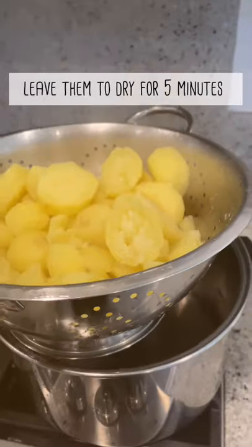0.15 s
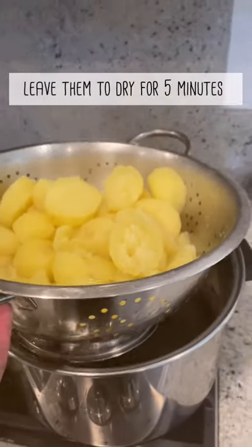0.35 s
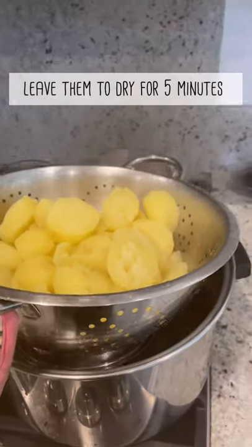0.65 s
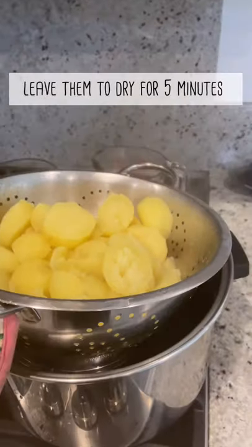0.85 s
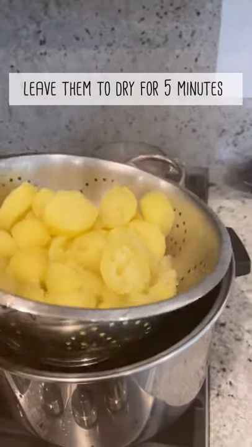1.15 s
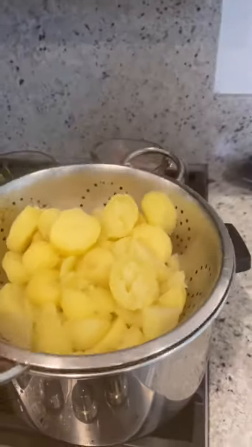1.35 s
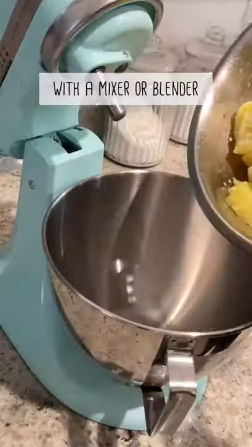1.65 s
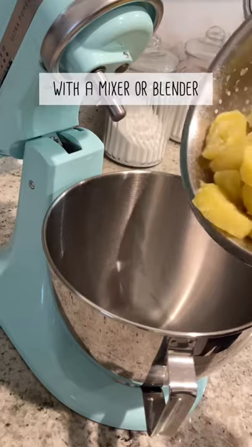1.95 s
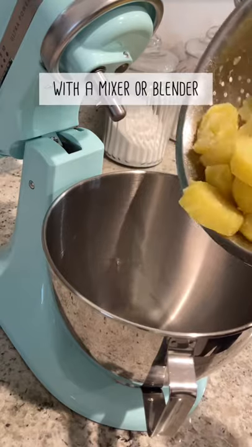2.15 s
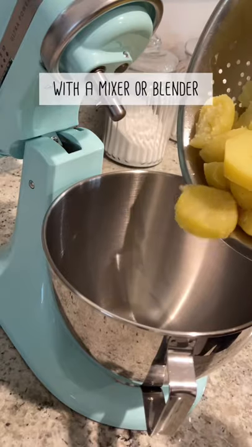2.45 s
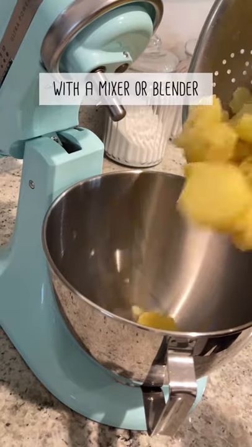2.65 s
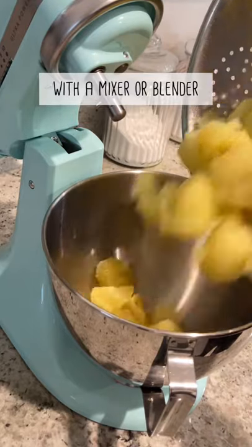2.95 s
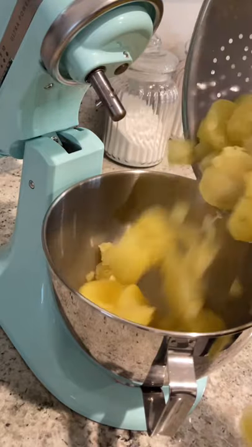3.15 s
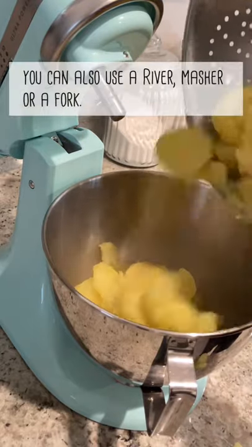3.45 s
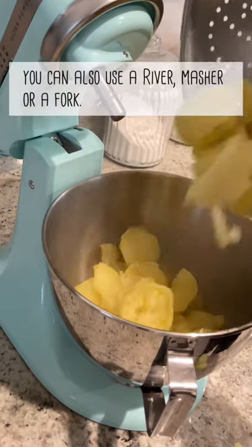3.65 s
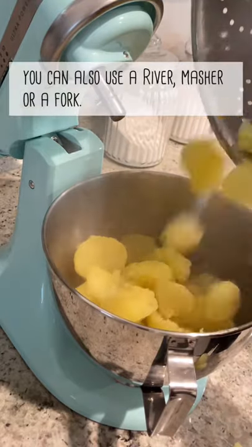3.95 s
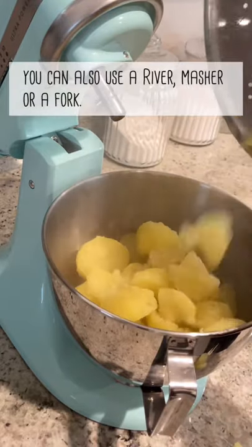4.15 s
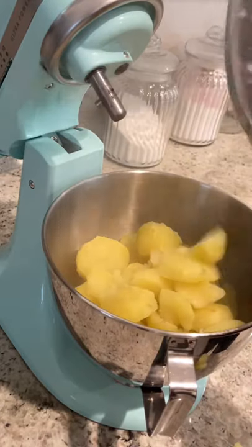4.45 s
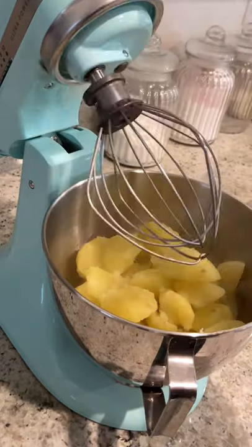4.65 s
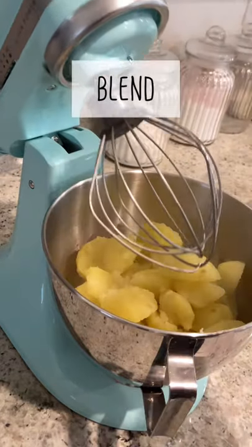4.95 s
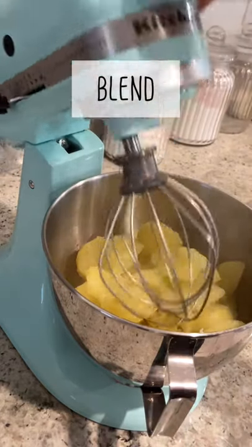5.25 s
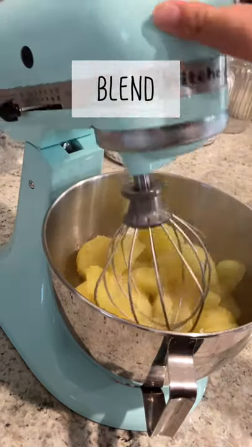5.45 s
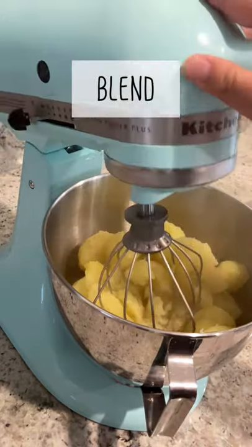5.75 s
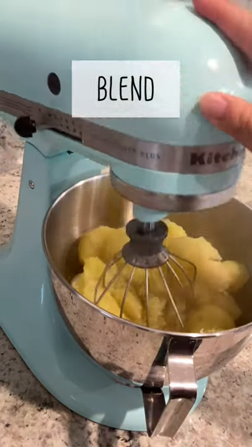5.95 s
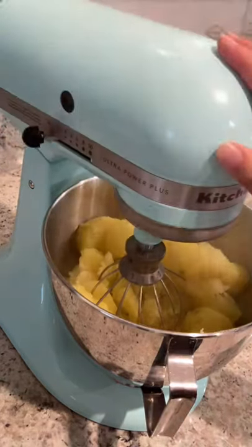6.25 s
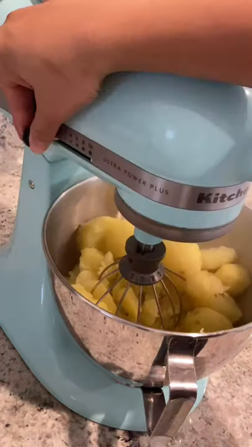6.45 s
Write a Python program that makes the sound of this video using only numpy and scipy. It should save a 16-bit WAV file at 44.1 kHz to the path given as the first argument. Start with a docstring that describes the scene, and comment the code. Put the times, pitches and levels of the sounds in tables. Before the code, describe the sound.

Close stereo microphone on a kitchen counter. First, faint handling bumps and steam hiss, then clattering metallic knocks as a colander settles on a pot, cut off sharply. Next, boiled potatoes drop softly into a metal bowl, one heavier thud followed by tumbling, rumble and sticky ticks. After a quiet pause come light whisk contacts, a weighty mixer-head slam with a small bounce, and a crisp final switch click.

```python
"""A steel colander of steaming potatoes knocks and settles on its pot, close to a pair of microphone ports.
Potatoes tumble into a mixer's steel bowl on a stone counter with wet ticks; the whisk sinks in, the mixer
head drops shut and its switch clicks. Blows ring the steel's resonances and set off bursts of banded noise;
wet ticks, steam hiss and the kitchen's room tone are shaped noise; noise-fed counter modes rumble, swelling
under the knocks and the rolling potatoes. The background steps between four stretches; some ringing stops dead."""
import sys
import numpy as np
from scipy import signal
from scipy.fft import rfft, irfft, next_fast_len
from scipy.io import wavfile
from scipy.ndimage import uniform_filter1d

SR = 44100
rng = np.random.default_rng(int(sys.argv[2]) if len(sys.argv) > 2 else 0)


def store_wav(level_fs):
    """Save 16-bit WAV to argv[1]."""
    pcm = np.round(np.clip(np.atleast_2d(level_fs), -1, 1) * 32767)
    wavfile.write(sys.argv[1], SR, pcm.T.astype(np.int16))


N = 290619
T = np.arange(N) / SR   # seconds

COLANDER_CUT_S, HEAD_CUT_S, SWITCH_S = 1.548, 6.376, 6.53
# Resonances of the counter (first three rows) and the steel bowl.
# Each row: pitch in Hz, relative level in dB, time to fall 60 dB when struck in seconds.
BOWL_MODES = [(54, 1, 0.24), (117, -2.5, 0.16), (149.5, -10.5, 0.15), (425, -4, 0.09), (447, -17, .3),
              (586, -18, 0.55), (662, -29, 0.4), (720, -35, 1.2), (830, -11, 0.11), (958, -31, .35),
              (1120, -39, 0.7), (1200, -13, 0.078), (1870, -19, 0.06), (2400, -11, 0.11), (2800, -11, .07)]


def amp(db):
    """Decibels to a linear factor."""
    return 10 ** (np.asarray(db) / 20)


def rms_one(x):
    """Scale a signal to an RMS of 1."""
    return x / np.sqrt(np.mean(x ** 2) + 1e-20)


def at_hz(points, hz):
    """Read a curve at one pitch, straight between its points on a log pitch scale."""
    points = np.array(points)
    return np.interp(np.log(hz), np.log(points[:, 0]), points[:, 1])


def drift(rate_hz):
    """Slow chance of spread 1: noise through two equal low-pass poles, drawn every 40 samples."""
    pole = np.exp(-80 * np.pi * rate_hz / SR)
    chance = rng.standard_normal(N // 40 + 2002)
    slow = signal.lfilter([1], [1, -2 * pole, pole * pole], chance)[2000:]
    return np.interp(np.arange(N) / 40, np.arange(len(slow)), rms_one(slow))


def spread(pair, hz):
    """Shared and opposed parts to left and right, as alike as the ports are at this pitch."""
    # Likeness of the two ports. Each row: pitch in Hz, left-right likeness (1 is identical).
    likeness = [(60, 1), (260, 0.97), (440, 0.71), (620, 0.15), (1200, 0.55), (2000, 0.81), (3000, 0.053),
                (4200, 0.16), (5500, 1), (6500, 0.95), (16000, 0.76)]
    alike = np.clip(at_hz(likeness, hz), -1, 1)
    shared = np.sqrt(1 + alike) * pair[0]
    opposed = np.sqrt(1 - alike) * pair[1]
    return shared + opposed * [[1], [-1]]


def ring(x, hz, t60):
    """A resonance: a unit click sets a sine of height 1 ringing, down 60 dB after t60 seconds."""
    pole, turn = amp(-60 / (t60 * SR)), 2 * np.pi * hz / SR
    return signal.lfilter([0, np.sin(turn)], [1, -2 * pole * np.cos(turn), pole * pole], x + 1e-18)


def noise_bands():
    """Third-octave bands of stereo noise, equal level per Hz, as (Hz, sound)."""
    edges = 32 * 2 ** (np.arange(28) / 3)
    white = rng.standard_normal((2, 2, N))   # neighbouring bands take turns between two noises
    for k, (low, high) in enumerate(zip(edges, edges[1:])):
        sos = signal.butter(2, [low, high], "band", fs=SR, output="sos")
        middle_hz = np.sqrt(low * high)
        yield middle_hz, spread(signal.sosfilt(sos, white[k % 2]), middle_hz)


def strength(events, hz):
    """Click train of the blows at one pitch: bass, middle and treble force joined on a log scale."""
    rows, clicks = np.array(events), np.zeros(N)
    bass = rows[:, 3] if rows.shape[1] > 3 else rows[:, 1]
    low = np.interp(np.log(hz), np.log([160, 260]), [1, 0])
    high = np.interp(np.log(hz), np.log([1000, 3200]), [0, 1])
    force_db = low * bass + (1 - low - high) * rows[:, 1] + high * rows[:, 2]
    clicks[np.round(rows[:, 0] * SR).astype(int)] = amp(force_db)
    return clicks


def dying(clicks, t60, rise_s):
    """Level that swells for a moment after each click and dies away."""
    rise = np.exp(-1 / (max(rise_s, 1e-4) * SR))
    fall = amp(-60 / (max(t60, .005) * SR))
    return signal.lfilter([1 - rise], np.convolve([1, -rise], [1, -fall]), clicks + 1e-18)


def scatter(spells, per_s, uneven_db):
    """Small events at random moments of each spell, uneven in strength, fading as it goes on."""
    rows = []
    for start, length, fade_db, *db in spells:
        for u, v in rng.random((200, 2))[:int(per_s * length)]:
            change_db = -fade_db * u - uneven_db * np.log(1 - 0.9 * v)
            rows.append((start + length * u, *np.add(db, change_db)))
    return rows


def struck(events, modes, contact_s, ring_db, waver_db, until_s):
    """A blow pushes the heavy counter once and chatters on the steel; loose contact makes the ringing waver."""
    push_s = .004    # how long a blow leans on the counter
    chatter_share = .35   # loose chatter in a blow on steel, the rest one clean contact
    out = np.zeros((2, N))
    span = slice(round(min(events)[0] * SR) - 100, round(until_s * SR))
    for hz, db, t60 in modes:
        force = np.tile(strength(events, hz)[span], (2, 1))
        if hz > 200:   # steel
            chance = rng.standard_normal(force.shape)
            chatter = dying(force, contact_s, rise_s=0.0012) * chance * np.sqrt(14 / (contact_s * SR))
            sides = [[1], [.4 * rng.choice([-1, 1])]]   # shared and opposed parts
            contact = uniform_filter1d(force * sides, size=round(SR / hz / 3))
            force = chatter_share * chatter + np.sqrt(1 - chatter_share ** 2) * contact
            db = db + ring_db + waver_db * np.tanh(drift(30)[span])
        else:
            force = uniform_filter1d(force, size=round(push_s * SR))
        out[:, span] += amp(db) * spread(ring(force, hz, t60), hz)
    return out


def wash(events, spectrum, hz, crack_s, tail_s, tail_db):
    """Level of a body's countless small modes in one band: a crack, then a swelling tail; faster in the treble."""
    # crack_s and tail_s are 60 dB falls at 1 kHz
    clicks = strength(events, hz) * amp(at_hz(spectrum, hz)) * np.sqrt(SR / 2 / hz)
    crack = dying(clicks, crack_s * (1000 / hz) ** .3, rise_s=.001 * (1000 / hz) ** .5)
    tail = dying(clicks, tail_s * (1000 / hz) ** 0.18, rise_s=0.0045)
    return crack + amp(tail_db) * tail


def colander():
    """Steel colander on the pot rim: knocks and rattles ring its modes; returns ringing and wash level by band."""
    # Knocks on the rim. Each row: time in seconds, middle and treble force in dB.
    knocks = [(0.835, -17.5, -17), (0.861, -19.5, -35), (0.877, -30.5, -41.5), (0.959, -16, -30),
              (1.049, -30, -48.5), (1.292, -37.5, -50.5), (1.323, -22.5, -36), (1.332, -23, -30),
              (1.340, -18.5, -18), (1.399, -13, -14.5), (1.436, -24.5, -27), (1.469, -21.5, -36),
              (1.523, -21, -29)]
    # Rattling on after knocks. Each row: start and length in seconds, fade over the spell in dB,
    # middle and treble force in dB before fade and unevenness.
    rattles = [(0.84, 0.15, 11.5, -34.5, -46.5), (0.965, 0.31, 25, -38, -51.5),
               (1.324, 0.085, 6, -42.5, -41.5), (1.405, 0.089, 16, -28.5, -33.5)]
    # Resonances. Each row: pitch in Hz, relative level in dB, time to fall 60 dB in seconds.
    modes = [(330, -3, .14), (364, -4, .22), (565, -13, .5), (754, -13, .9), (788, -6, .18), (864, -3, .16),
             (955, -8, .15), (1055, -12, .2), (1164, -5, .2), (1320, -12, .25), (1655, -20, .45),
             (1930, -20, .35), (2435, -13, .6), (2650, -15, .3), (3255, -15, .6), (3366, -13, .25),
             (3455, -15, .3), (3682, -19, .4), (3820, -14, .3), (3967, -9, .12), (4066, -12, .45),
             (4097, -13, .3), (4200, -12, .27), (4544, -19, .5), (4700, -11, .3), (4802, -13, .2),
             (5092, -15, .3), (5285, -9, .25), (5345, -8, .18), (5460, -14, .25), (5636, -13, .3),
             (5905, -11, .18)]
    # Colour of the small modes. Each row: pitch in Hz, relative level in dB.
    colour = [(150, -19), (350, -20.5), (900, -17.5), (2000, -12), (3000, -10), (5000, -2), (8000, -9),
              (15000, -21)]
    events = knocks + scatter(rattles, per_s=130, uneven_db=2.5)

    def wash_level(hz):
        level = wash(events, colour, hz, crack_s=0.058, tail_s=0.21, tail_db=-17.0)
        rattling = amp(3.4 * drift(50))
        return (T < COLANDER_CUT_S) * level * rattling

    ringing = struck(events, modes, contact_s=0.031, ring_db=-11.0, waver_db=5.5, until_s=COLANDER_CUT_S)
    return ringing, wash_level


def potatoes_in_bowl():
    """Potatoes and whisk thud on bowl and counter; returns the ringing and the wash level by band."""
    # Separate thuds. Each row: time in seconds, middle, treble and bass force in dB.
    thuds = [(1.954, -31, -45.5, -25), (2.651, -34, -41.5, -29), (2.824, -10, -34.5, -24.5),
             (2.879, -44, -46.5, -20.5), (3.032, -42.5, -72, -33), (3.21, -50, -60, -31),
             (3.643, -46.5, -91, -33), (3.847, -50, -56, -34.5), (3.898, -87, -67, -34),
             (4.599, -76, -80, -40), (5.233, -52.5, -73, -54), (5.265, -43, -51.5, -47),
             (5.299, -68, -79, -38), (5.356, -56, -63.5, -34.5)]
    # The heap tumbling in with many more thuds. Each row: start and length in seconds, fade over the spell
    # in dB, middle, treble and bass force in dB before fade and unevenness.
    tumble = [(2.86, 0.76, 33, -47.5, -68, -35.5)]
    # Colour of the bowl's small modes. Each row: pitch in Hz, relative level in dB.
    colour = [(150, -6.5), (400, -19.5), (1000, -15.5), (2500, -4), (5000, -1), (9000, 2.5), (15000, -4)]
    events = thuds + scatter(tumble, per_s=24, uneven_db=7.5)

    def wash_level(hz):
        return wash(events, colour, hz, crack_s=0.04, tail_s=0.24, tail_db=-15)

    ringing = struck(events, BOWL_MODES, contact_s=0.018, ring_db=-2.0, waver_db=2.5, until_s=HEAD_CUT_S)
    return ringing, wash_level


def wet_ticks():
    """Potatoes part, land and slide with wet ticks; returns their fluttering noise level by band."""
    # Separate ticks. Each row: time in seconds, treble and middle force in dB.
    single = [(2.9213, -37.5, -61), (3.0769, -41, -45), (3.146, -45, -38), (3.1888, -34.5, -44),
              (3.2144, -45, -61), (3.4915, -41, -74), (3.2445, -62, -58), (3.6332, -36.5, -63),
              (3.7529, -48, -67), (3.7826, -33.5, -44), (3.7924, -58, -31), (3.8408, -28, -26.5),
              (3.966, -43, -44), (4.034, -36, -26), (4.0852, -41.5, -72), (4.104, -46, -64),
              (4.4687, -40, -65.5), (4.6738, -51, -39.5), (6.0886, -51, -43)]
    # Crackle of sliding potatoes and the whisk pressing in. Each row: start and length in seconds,
    # fade over the spell in dB, treble and middle force in dB before fade and unevenness.
    crackle = [(2.6, 0.35, 6, -67, -52), (5.45, 1.1, 0, -73.5, -61.5), (2.88, 1.25, 1.5, -63, -59)]
    # Colour of a tick. Each row: pitch in Hz, relative level in dB.
    colour = [(700, -52), (1800, -13), (3000, -11), (5500, -6), (9000, -2), (12000, -7.5), (16000, 1)]
    rows = np.array(single + scatter(crackle, per_s=60, uneven_db=7.0))

    def tick_level(column):
        clicks = np.zeros(N)
        clicks[np.round(rows[:, 0] * SR).astype(int)] = amp(rows[:, column])
        room_tail = amp(-19.5) * dying(clicks, 0.099, rise_s=0.0065)
        return dying(clicks, 0.014, rise_s=0.00063) + room_tail

    bright, dull = tick_level(column=1), tick_level(column=2)

    def level_at(hz):
        flutter_db = 2.6 * drift(78)
        return (bright if hz > 4000 else dull) * amp(at_hz(colour, hz) + flutter_db)

    return level_at


def taps():
    """Steel touches the bowl, first the colander, then the whisk, and wavering pitches ring."""
    # Touches. Each row: time in seconds, middle and treble force in dB.
    touches = [(1.958, -53.5, -67.5), (5.264, -47.5, -52)]
    # The colander's own pitch, then the bowl rim's.
    # Each row: pitch in Hz, relative level in dB, time to fall 60 dB in seconds.
    modes = [(1812, -11, 0.5), (1790, -6, .15), (3270, -12, 0.1), (3960, -12, 0.07), (4830, -14, 0.06),
             (5600, -16, 0.08)]
    own = struck(touches[:1], modes[:1], contact_s=0.0076, ring_db=14.0, waver_db=4.5, until_s=HEAD_CUT_S)
    rim = struck(touches, modes[1:], contact_s=0.0071, ring_db=8.0, waver_db=7.0, until_s=HEAD_CUT_S)
    return own + rim


def slides():
    """Potatoes sliding down the wall keep one bowl pitch singing through long, chattering contact."""
    # Slides. Each row: time in seconds, middle and treble force in dB.
    moments = [(3.178, -54, -74), (3.375, -57.5, -77)]
    # The one pitch. Each row: pitch in Hz, relative level in dB, time to fall 60 dB in seconds.
    mode = [(1108, 0, 0.16)]
    return struck(moments, mode, contact_s=0.5, ring_db=2.0, waver_db=7.0, until_s=HEAD_CUT_S)


def bumps():
    """Small dull knocks of handling and of potatoes on steel each ring a few cycles of one pitch."""
    # Each row: time in seconds, starting peak in dB, pitch in Hz.
    knocks = [(0.032, -39, 457), (0.067, -48, 483), (0.262, -46, 538), (0.529, -44.5, 626),
              (0.579, -37.5, 1170), (0.58, -40, 428), (0.644, -42.5, 483), (1.927, -48.5, 586),
              (2.921, -47, 1870), (2.984, -49, 1800), (3.098, -51, 1870), (3.147, -51, 1860),
              (3.214, -53, 2840), (3.263, -53, 1170), (3.793, -44.5, 1140), (4.5452, -52, 1210),
              (4.901, -44.5, 364), (5.353, -37, 366), (5.594, -50, 1250), (5.907, -49, 1230)]
    cycles = 31   # until a knock has died by 60 dB
    out = np.zeros((2, N))
    for s, db, hz in knocks:
        start = round(s * SR)
        since = T[:N - start][:SR // 5]
        note = amp(db - 60 * since * hz / cycles) * np.sin(2 * np.pi * hz * since)
        out[:, start:start + len(since)] += note
    return out


def mixer_head():
    """The head drops shut and bounces, then the switch clicks, ringing its body; returns ringing and wash level."""
    # Shutting, bounces, switch. Each row: time in seconds, middle, treble and bass force in dB.
    slams = [(6.151, -13, -21.5, -12), (6.156, -11.5, -9, -6), (6.166, -41, -21, -14),
             (6.196, -25, -42, -17.5), (6.537, -18.5, -30.5, -41), (6.544, -96, -8, -20.5),
             (6.562, -21.5, -36, -35), (6.581, -34, -46, -25)]
    # Resonances. Each row: pitch in Hz, relative level in dB, time to fall 60 dB in seconds.
    modes = [(61, 0, .25), (78, -13, .4), (101, -17, .22), (119, -5, 0.26), (352, -8, 0.22), (385, -8, .1),
             (479, -15, .2), (594, -15, 0.4), (814, -12, 0.14), (1015, -13, 0.13), (1800, -14.5, 0.064)]
    # Colour of the small modes. Each row: pitch in Hz, relative level in dB.
    colour = [(270, -23), (380, -13.5), (1000, -15.5), (2500, -17.5), (5000, -21.5), (9000, -23.5),
              (15000, -31.5)]
    shutting = [row for row in slams if row[0] < SWITCH_S]
    switch = slams[len(shutting):]

    def wash_level(hz):
        shut = wash(shutting, colour, hz, crack_s=0.072, tail_s=0.43, tail_db=-15.0)
        click = wash(switch, colour, hz, crack_s=0.098, tail_s=0.58, tail_db=-10.5)
        return (T < HEAD_CUT_S) * shut + click

    ringing = struck(shutting, modes, contact_s=0.0099, ring_db=-5.2, waver_db=4.0, until_s=HEAD_CUT_S)
    ringing += struck(switch, modes, contact_s=0.078, ring_db=-9.5, waver_db=9.0, until_s=N / SR)
    return ringing, wash_level


def per_stretch(column):
    """One column of the background table, held until the next stretch begins."""
    # Each row: start in seconds, room tone in relative dB, its change below 220 Hz in dB,
    # counter rumble in dB.
    stretches = [(0, -32.5, -16.5, -91), (1.549, -36, 2, -62), (4.672, -34, -1.5, -55),
                 (6.377, -34.5, -12, -50.5)]
    rows = np.array(stretches)
    return rows[np.searchsorted(rows[:, 0], T, side="right") - 1, column]


def rumble():
    """Unevenly drifting noise keeps the three counter modes stirring; swells rise quickly and fade."""
    # Low rumble through the counter: two swells under the colander's knocks, then one as potatoes roll.
    # Each row: start in seconds, level before fading in dB, fade in dB per second.
    swells = [(0.55, -58, 7.5), (0.95, -38, 63.5), (2.84, -36, 23)]
    rise_s = 0.023
    stirring = rng.standard_normal((2, N)) * amp(1.8 * drift(38))
    low = sum(amp(db) * spread(ring(stirring, hz, 0.632 * t60), hz) for hz, db, t60 in BOWL_MODES[:3])
    level = amp(per_stretch(column=3))
    for s, db, fade_db in swells:
        rise = np.clip((T - s) / rise_s, 0, 1)
        level = level + rise * amp(db - fade_db * np.maximum(T - s, 0))
    return rms_one(low) * level


def background():
    """Room tone stepping between stretches and a rising and falling hiss, steam at first; returns level by band."""
    # Colour of the room tone. Each row: pitch in Hz, relative level in dB per Hz.
    tone_colour = [(18, -35), (30, 1), (108, -13), (146, -11.5), (290, -10), (316, -16), (359, -19),
                   (506, -18), (563, -11.5), (811, -19.5), (1170, -22), (1640, -33), (2410, -28.5),
                   (5000, -42.5), (6500, -69), (11000, -120)]
    # Colour of the hiss. Each row: pitch in Hz, relative level in dB per Hz.
    hiss_colour = [(1000, 2), (2500, -3), (4000, -3.5), (5500, 2.5), (8000, -2), (9500, 3), (12000, 0),
                   (14000, -3.5), (16000, 5)]
    # Course of the hiss. Each row: time in seconds, relative level in dB.
    hiss_course = [(0, -49.5), (0.85, -50.5), (1.1, -58.5), (1.546, -70), (1.55, -73), (2.3, -78.5),
                   (2.7, -75), (3.0, -70), (3.5, -73.5), (4.15, -76), (4.66, -79.5), (4.68, -75),
                   (5.3, -76.5), (5.5, -70), (6.12, -65), (6.37, -90), (6.59, -67.5)]
    room, bass = amp(per_stretch(column=1)), amp(per_stretch(column=2))
    hiss = amp(np.interp(T, *np.transpose(hiss_course)))

    def level_at(hz):
        tone = room * (bass if hz < 220 else 1) * amp(at_hz(tone_colour, hz) + 0.66 * drift(6.8))
        return np.hypot(tone, hiss * amp(at_hz(hiss_colour, hz)))

    return level_at


def hum():
    """A faint steady tone: noise in one narrow resonance."""
    # In order: pitch in Hz, width setting in Hz (ring time is 1.5 over it), RMS level in dB.
    hz, width, db = (373, 10, -64)
    return amp(db) * rms_one(ring(rng.standard_normal(N), hz, 1.5 / width))


def scene():
    """Noisy layers share one filter bank; the ringing, rumble, hum and small knocks are added."""
    colander_ring, colander_wash = colander()
    bowl_ring, bowl_wash = potatoes_in_bowl()
    head_ring, head_wash = mixer_head()
    tick_level, background_level = wet_ticks(), background()
    out = 0
    for hz, noise in noise_bands():
        level = background_level(hz) + tick_level(hz)
        if hz > 220:
            level = level + colander_wash(hz) + bowl_wash(hz) + head_wash(hz)
        out = out + level * noise
    out += colander_ring + bowl_ring + head_ring
    return out + taps() + slides() + bumps() + rumble() + hum()


def record(dry):
    """The ports differ in phase and level by pitch, the bass lags and is cut, the top is cut."""
    # The ports swing in and out of phase up the treble. Each row: pitch in Hz, half turns that left leads.
    port_lead = [(0, 0), (5400, .1), (6800, .97), (8000, 1.03), (9800, 1.97), (11300, 2.03), (12700, 2.97),
                 (14400, 3.03), (16000, 4)]
    # Balance of the ports. Each row: pitch in Hz, left over right in dB.
    balance = [(60, 0.3), (300, 0.6), (700, 2.5), (3770, -1.5), (15000, 0)]
    bass_lag_turns = 0.74   # low pitches arrive this many cycles late
    bass_cut_hz, top_cut_hz = 56.8, 16700
    size = next_fast_len(N + 8192)
    hz = np.arange(size // 2 + 1) * SR / size + 1
    # half the difference goes to left, its inverse to right
    half = np.exp(.5j * np.pi * np.interp(hz, *np.transpose(port_lead))) * amp(at_hz(balance, hz) / 2)
    lag = np.exp(-2j * np.pi * bass_lag_turns * np.log(np.clip(hz / 1500, .02, 1)))
    ports = irfft(rfft(dry, size) * [half, 1 / half] * lag, size)[:, :N]
    ports = signal.sosfilt(signal.butter(6, bass_cut_hz, "high", fs=SR, output="sos"), ports)
    return signal.sosfilt(signal.cheby2(12, 70, top_cut_hz, fs=SR, output="sos"), ports)


dry = scene()
out = record(dry)
store_wav(out)
```